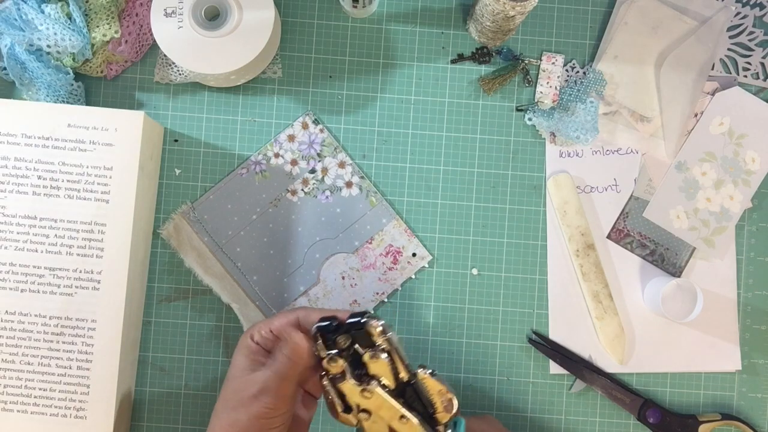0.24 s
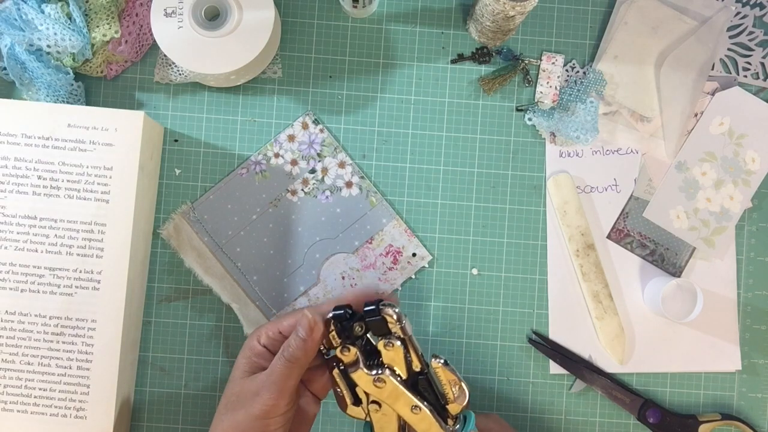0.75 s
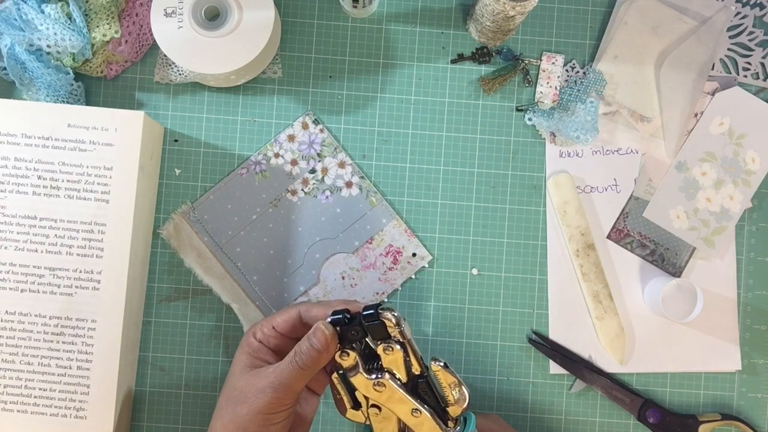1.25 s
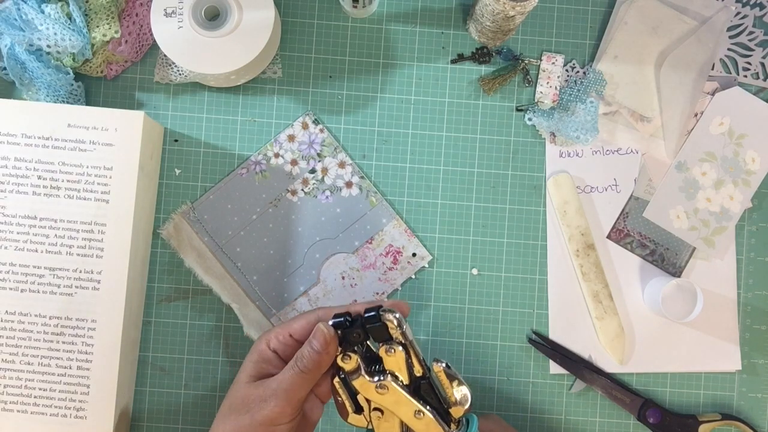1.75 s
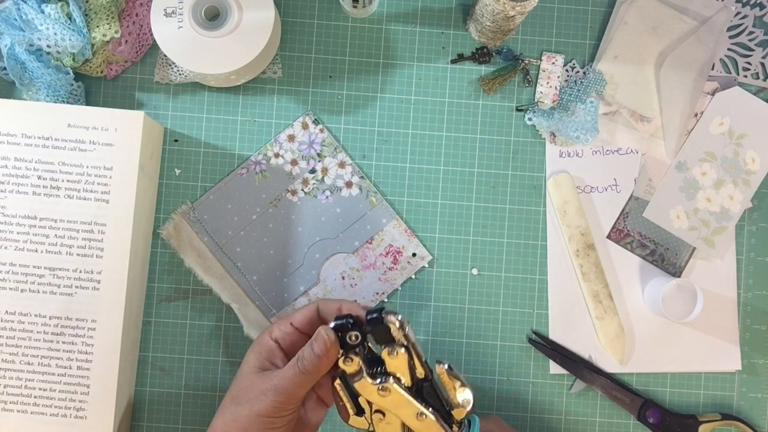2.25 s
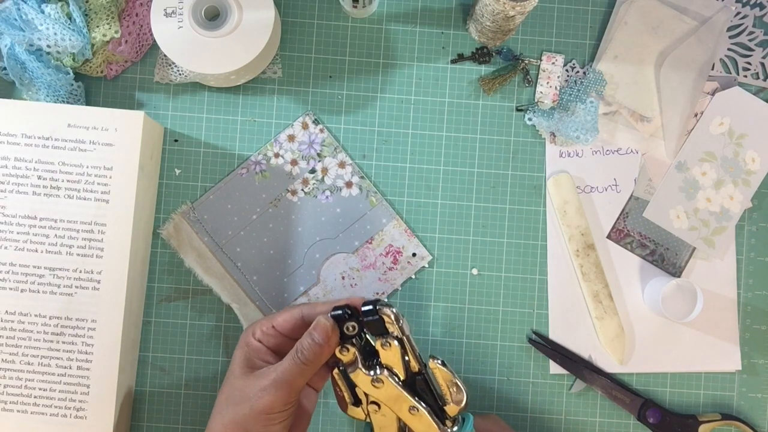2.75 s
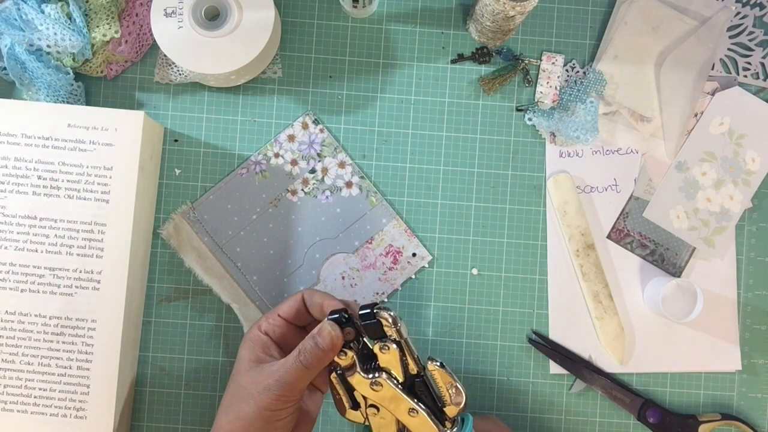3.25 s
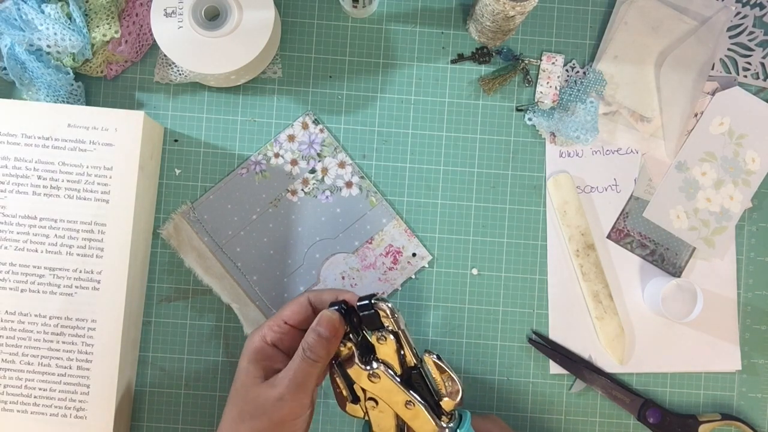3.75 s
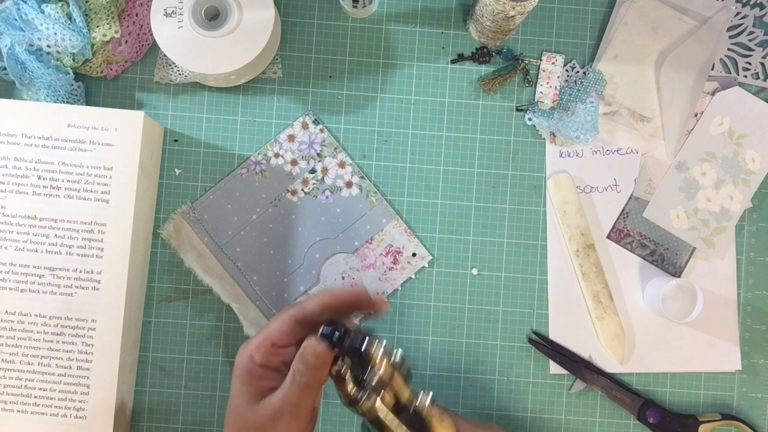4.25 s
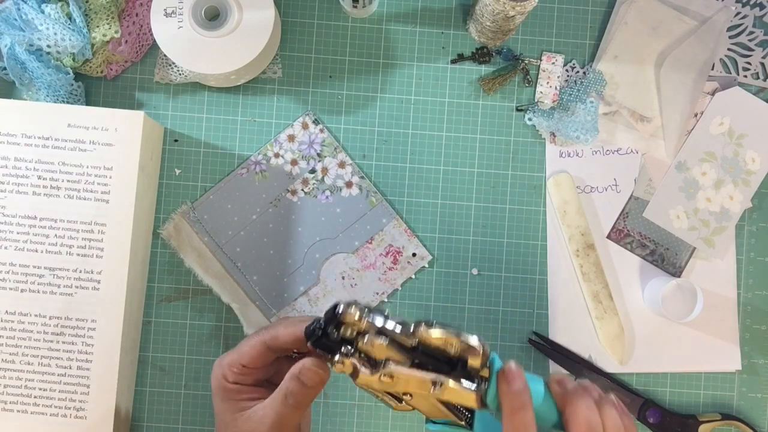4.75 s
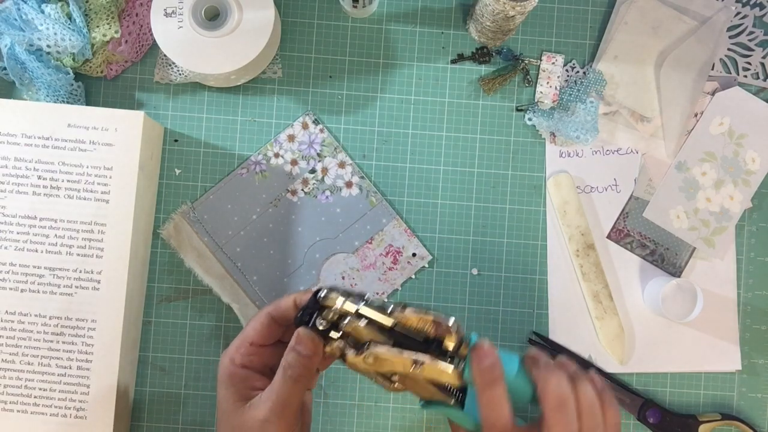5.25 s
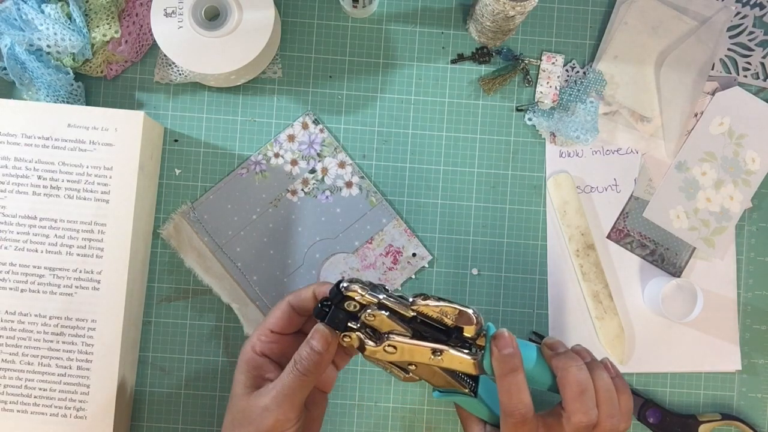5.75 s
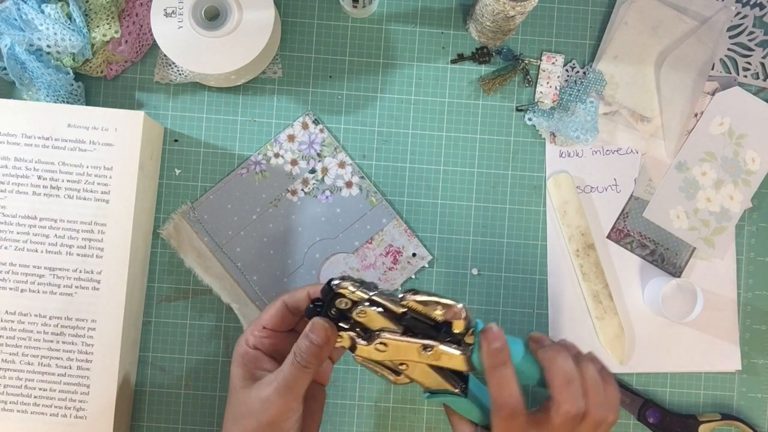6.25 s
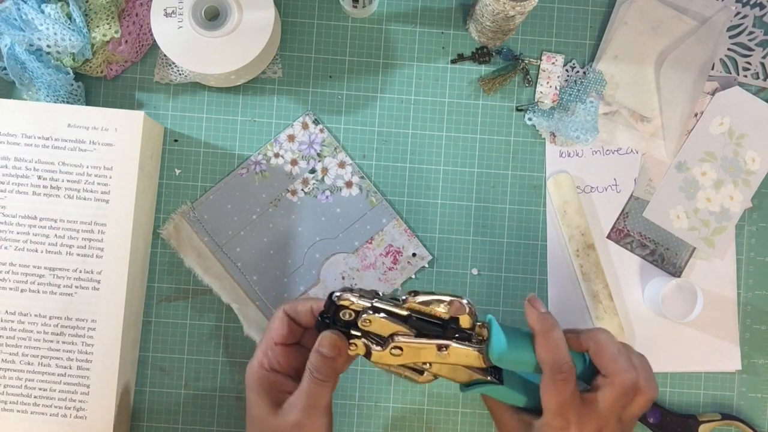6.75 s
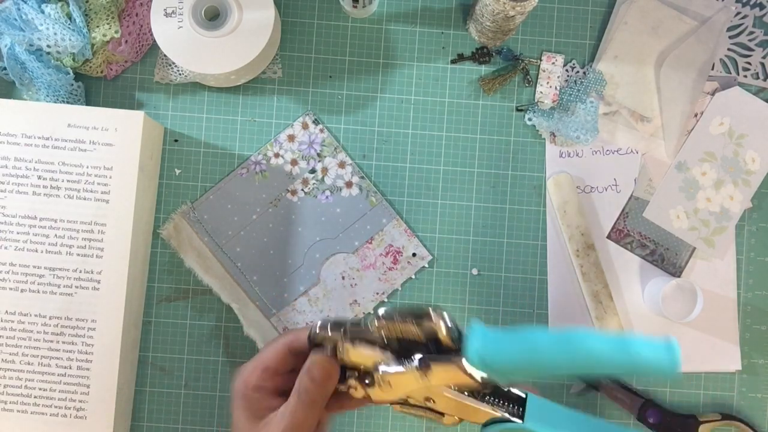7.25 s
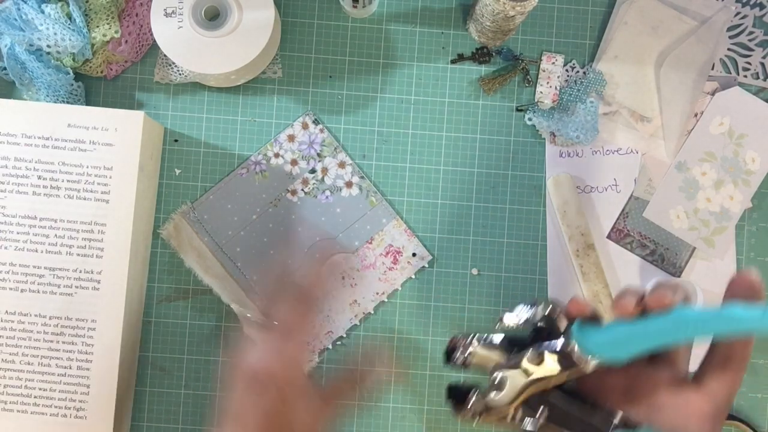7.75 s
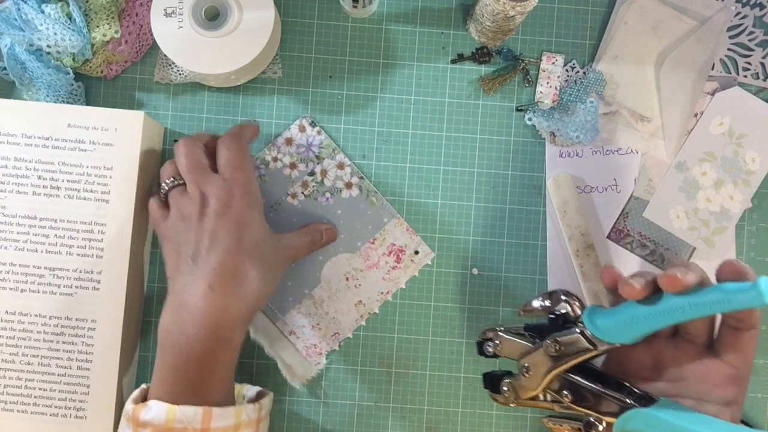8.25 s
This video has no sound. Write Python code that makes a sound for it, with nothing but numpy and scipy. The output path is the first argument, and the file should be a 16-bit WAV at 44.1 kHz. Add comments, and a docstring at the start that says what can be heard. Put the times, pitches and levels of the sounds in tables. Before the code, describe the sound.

Close-miked craft desk in a quiet small room, with low hum, deep slow sway and a barely audible high whine throughout. At 0.1 s a steel hand punch gives a crisp, bright double clack. Faint ticks and a soft desk rub follow near 1.5-2 s, a small click at 2.5 and a sharp one at 2.8, then tiny fumbling clicks. At 3.9 s comes the loudest event, a hard cracking snap with a faint metallic ring. Light handling clicks lead to a strong burst of clacks at 5.1-5.2 s with a low thump. A dry tick falls at 5.9, a double clack at 6.1 and a ringing clank at 6.7. The hinge squeaks briefly around 7.0 and 7.3, with duller handle knocks at 7.5. From 7.6 s hands swish and brush over paper and desk, peaking near 8.05, with faint last clicks at 8.3.

```python
"""Sharp metal clacks come first: a hand eyelet punch is handled over a craft desk, its dies clicking round.
Each blow is a burst of contacts ringing decaying sine tones; filtered random slips make the hinge creak.
Loose parts sing as single tones, ticks are tiny pulses, and sparse taps make the echoes.
Hands and paper rustle as coloured snaps. Behind them, shaped noise makes soft thumps, a low hum and
a slow sway, and one steady sine tone makes a thin whine."""
import sys
import numpy as np
from scipy import signal
from scipy.fft import rfft, irfft, next_fast_len
from scipy.io import wavfile
from scipy.ndimage import uniform_filter1d

SR = 44100
rng = np.random.default_rng(int(sys.argv[2]) if len(sys.argv) > 2 else 0)


def voltage_ratio(level):
    """Linear amplitude factor for a level in decibels (scalar or array-like)."""
    return 10 ** (np.asarray(level, float) / 20)


def waveform_to_disk(signal):
    """Save audio, clipped to [-1, 1], as 16-bit WAV at the path in sys.argv[1]."""
    frames = np.transpose(np.atleast_2d(signal))
    scaled = np.clip(frames, -1, 1) * 32767
    samples = np.round(scaled).astype(np.int16)
    wavfile.write(sys.argv[1], SR, samples)


N = 375291  # length in samples, about 8.5 s


def evened(x):
    """Scales a signal to an average strength (rms) of 1."""
    return x / np.sqrt(np.mean(x ** 2) + 1e-20)


def read(points, hz):
    """Reads a table of values against pitch, on a log frequency axis."""
    f, value = np.transpose(points)
    return np.interp(np.log(hz + 1), np.log(f + 1), value)


def along(rows):
    """Draws each column of a table of times as a curve with a value at every sample."""
    s, *columns = np.transpose(rows)
    return [np.interp(np.arange(N) / SR, s, c) for c in columns]


def coloured(x, points):
    """Filters x by a spectrum table and brings the result to rms 1."""
    size = next_fast_len(len(x))
    gain = voltage_ratio(read(points, np.fft.rfftfreq(size, 1 / SR)))
    return evened(irfft(rfft(x, size) * gain, size)[:len(x)])


def resonate(x, hz, width):
    """One resonance of gain 1 at its centre; its pitch may stand still or move."""
    turn = np.exp(2j * np.pi * np.cumsum(hz * np.ones(len(x))) / SR)
    r = np.exp(-np.pi * width / SR)  # a wider resonance dies faster
    return 2 * (turn * signal.lfilter([1 - r], [1, -r], x / turn)).real


def grains(per_s, spread_db):
    """Sparse clicks of random sign, a few of them large."""
    size = voltage_ratio(spread_db * np.minimum(rng.exponential(1, N), 4))
    sign = rng.choice([-1., 1.], N)
    return size * sign * (rng.random(N) < per_s / SR)


def blows():
    """Each blow is a short rattle of contacts that cracks and rings the steel; where it lands sets the colour."""
    # the blows: start_s, peak_db (4.5-9 kHz), clank_db (2-4.5 kHz) and fizz_db (over 9 kHz), both relative
    # to the peak, ring_hz (modes near it ring most)
    blow_rows = [(0.05, -47, 12.5, -4, 3350), (0.056, -42, 4, 13.5, 2150), (0.0906, -14.5, -10, 7.5, 13400),
                 (0.1, -31.5, 3.5, 13.5, 4040), (0.739, -54, -5, -8, 6100), (1.709, -51, -9, -12, 6130),
                 (1.838, -54, -3, -4, 7500), (1.8579, -49, -11, -11, 8460), (1.87, -52, -5, -4, 6200),
                 (1.972, -37.5, -3.5, -26, 3100), (2.288, -56, -3, -1, 6100),
                 (2.47, -33.5, -4.5, -18, 6640), (2.7923, -15, -11.5, 1.5, 8800),
                 (2.8003, -38.5, 4, -1, 7060), (2.989, -53, -8, -7, 8510), (3.01, -51, -8, -2, 6500),
                 (3.1604, -54.5, -4, -1, 6200), (3.2847, -42, -1.5, -6, 2370), (3.309, -42, -14, -12, 7890),
                 (3.686, -45.5, -2.5, -8.5, 2740), (3.9266, 5.5, -20.5, -6.5, 6750),
                 (4.1947, -47, -9, 1.5, 10500), (4.206, -54, -8, 3, 10900), (4.2376, -44, -18, -8, 7800),
                 (4.3526, -43.5, -10, 3, 6140), (4.423, -48, -6, 4, 6000), (4.754, -50, -3, -8.5, 5260),
                 (4.7804, -28.5, -14.5, -14, 8730), (4.8736, -35.5, -14, -11.5, 8550),
                 (5.0868, -11, -14.5, 9.5, 10350), (5.0975, -15, -5, -5, 10700),
                 (5.0994, -3.5, -11, 14, 10960), (5.2146, -13.5, -18, -9, 8430),
                 (5.2181, -14.5, -9.5, -5, 5670), (5.3685, -38, 2, 2, 3160),
                 (5.6374, -45, -9.5, -5.5, 3170), (5.6632, -33.5, -1.5, -22.5, 5370),
                 (5.8505, -44.5, -1, -2.5, 2260), (6.071, -39, 3.5, -10, 6500),
                 (6.075, -15.5, -17.5, -2, 6600), (6.102, -12, -10.5, 3.5, 12400),
                 (6.2393, -54, -1, 2, 3740), (6.6945, -28, -13.5, -29.5, 7020), (6.702, -37.5, 0, -7, 3130),
                 (6.712, -12.5, -9.5, -7.5, 3230), (6.97, -51, 7, -2, 3050), (7.0036, -32, -5, -3, 3060),
                 (7.2298, -38, -12, 0, 7100), (7.344, -41.5, -11, 1, 6000), (7.3838, -38.5, 1, 4, 5160),
                 (7.501, -49, 5.5, -4, 2800), (7.505, -34, 8, -9, 1240), (7.508, -33, 6, -4.5, 1400),
                 (7.529, -45, 0, -7, 2800), (7.5736, -35.5, -1.5, -13, 2320), (7.707, -46.5, 2, -7.5, 2100),
                 (8.253, -46, 1, -8, 2280), (8.27, -48, -1.5, 0, 2400), (8.301, -42.5, -18, -2, 7000)]
    # what the steel rings with: pitch_hz, level_db (relative, before each band is scaled), t60_s (60 dB fall)
    steel_modes = [(500, -10, .01), (750, -10, .01), (1200, -8, .018), (1500, -8, .014), (1900, -7, .01),
                   (2300, -6, .008), (2750, -6, .008), (3150, -6, .01), (3650, -4, .007), (4300, -2, .006),
                   (5150, -2, .006), (5600, -3, .005), (6200, 0, .006), (7000, -1, .005), (7600, -2, .005),
                   (8400, -2, .005), (9000, -2, .004), (9500, -3, .004), (10100, -2, .004),
                   (10700, 0, .006), (11400, -2, .004), (12100, -2, .004), (12700, -3, .004),
                   (13400, -3, .004), (14200, -4, .004), (15200, -4, .004)]
    # limits of the knock, clank, main and fizz bands: edge_hz
    band_limits = [300, 2000, 4500, 9000, 16000]
    hard_rattle_s, soft_rattle_s = .0025, .006  # hard blows are short, faint fumbles drag on
    soft_db, soft_span_db = -44, 2.5  # peak level halfway between hard and soft, and how gradual the change is
    push_s = 0.00047

    t, out = np.arange(SR // 10) / SR, np.zeros(N + SR)
    hz, db, t60 = (c[:, None] for c in np.transpose(steel_modes))
    rings = voltage_ratio(db - 60 * t / t60) * np.sin(2 * np.pi * hz * t)
    band = np.searchsorted(band_limits, hz[:, 0]) - 1
    sieves = [signal.butter(2, band_limits[k:k + 2], "band", fs=SR, output="sos") for k in range(4)]

    for s, peak_db, clank_db, fizz_db, ring_hz in blow_rows:
        at = round(s * SR)
        handle = ring_hz < band_limits[1]  # a struck handle knocks low
        knock_db = clank_db - 12.5 + 20 * handle
        soft = 1 / (1 + np.exp((peak_db - soft_db) / soft_span_db))
        length = hard_rattle_s + (soft_rattle_s - hard_rattle_s) * soft

        # separate contacts over a scrape
        chance = rng.standard_normal((3, 512))
        fade = 1 / (1 + (t[:512] / length) ** 3)
        contacts = (np.sign(chance[0]) + .4 * chance[0]) * (chance[1] > 1.35)
        contacts[0] = 2.0  # the first contact
        rattle = (contacts + 0.15 * chance[0]) * fade

        # modes near the point of contact ring most, and their levels vary slightly at random from blow to blow
        distance = np.log(hz[:, 0] / ring_hz) / 0.29
        near_db = (20.0 + 19.0 * handle) * np.exp(-distance ** 2)
        reach = voltage_ratio(near_db + 0.58 * chance[2, :len(hz)])

        # the whole tool jumps: a short dull push that grows twice as fast in dB as the peak
        push = (1 - t / push_s) * np.exp(-t / push_s)
        out[at:at + len(t)] += voltage_ratio(2 * peak_db - 32.5) * push

        for k, level_db in enumerate([knock_db, clank_db, 0, fizz_db]):
            body = (reach * (band == k)) @ rings
            body[0] += 4.0  # the crack of the contact itself
            sound = signal.sosfilt(sieves[k], signal.fftconvolve(body, rattle)[:len(t)])
            sign = (-1) ** k  # alternate signs let neighbouring bands join without a gap
            out[at:at + len(t)] += sign * voltage_ratio(peak_db + level_db) * sound / abs(sound).max()
    return out[:N]


def creak():
    """Uneven slips of the hinge ring the handles; the upper ring moves with the grip."""
    # hinge squeaks: peak_s, level_db, rise_s, low_ring_db (relative to level_db), upper_ring_hz
    squeaks = [(6.918, -59.5, .1, -5, 3080), (7.007, -32, 0.0093, -28.5, 3150), (7.15, -62, 0.28, -1, 2980),
               (7.24, -56, 0.11, -3, 2790), (7.281, -36, 0.077, -11.5, 2940),
               (7.324, -46.5, 0.035, -15, 2880)]
    t = np.arange(N) / SR
    s, level_db, rise, low_db, hz = np.transpose(squeaks)[:, :, None]
    away = np.maximum((s - t) / rise, (t - s) / (0.87 * rise))  # falls a little faster than it rises
    swell = voltage_ratio(level_db - 29.5 * away)  # climbs 29.5 dB over the rise
    slips = evened(grains(1000, 2.1))
    moving_hz = np.interp(t, s[:, 0], hz[:, 0])
    upper = evened(resonate(resonate(slips, moving_hz, 230), moving_hz, 580))
    lower = evened(resonate(resonate(slips, 1240, 100), 1280, 231))
    return swell.sum(0) * upper + (voltage_ratio(low_db) * swell).sum(0) * lower


def pings():
    """Loose springs and levers sing on as single tones that build up briefly and die."""
    # singing parts: start_s, pitch_hz, level_db (before build-up and wavering), t60_s (60 dB fall)
    tones = [(.091, 7160, -50, 0.16), (1.62, 1970, -66, 0.59), (3.928, 2810, -58, 1),
             (3.93, 3050, -51, 0.4), (3.96, 7040, -64, 0.6), (5.1, 1420, -45.5, 0.2),
             (5.098, 3240, -53.5, 0.35), (5.22, 2820, -47.5, 0.12), (6.102, 3350, -58, 0.31),
             (6.711, 3120, -53.5, 0.33), (6.712, 3320, -24, 0.028), (7.187, 3870, -43.5, 0.027),
             (7.229, 3820, -46, 0.027), (7.571, 1236, -40, 0.1)]
    t, out = np.arange(SR // 2) / SR, np.zeros(N + SR)
    for s, hz, db, t60 in tones:
        at = round(s * SR)
        build_up = 1 - np.exp(-t / (0.033 * t60))
        out[at:at + len(t)] += voltage_ratio(db - 60 * t / t60) * build_up * np.sin(2 * np.pi * hz * t)
    wavering = evened(uniform_filter1d(rng.standard_normal(N), size=500))  # slow and random, roughens the tones
    return out[:N] * voltage_ratio(4.6 * wavering)


def ticks():
    """Dry ticks with no ring or echo: smooth pulses about a tenth of a millisecond long."""
    # ticks: centre_s, level_db, sign (push or pull)
    tick_rows = [(5.8993, -17, -1), (1.9478, -33, 1), (4.5976, -31, 1)]
    out, pulse = np.zeros(N), np.hanning(6)
    for s, db, sign in tick_rows:
        out[round(s * SR) - 2:][:6] += sign * voltage_ratio(db) * pulse
    return out


def echoes(x):
    """Desk and walls: sparse taps, each band dying at its own speed; three tails take turns."""
    # how fast the near echo dies: pitch_hz, t60_s (60 dB fall)
    decay = [(300, .05), (2000, .07), (5000, 0.074), (10000, 0.078), (16000, 0.023)]
    out, turn = np.zeros(N), np.arange(N) / SR * 1.6
    for k in range(3):
        taps = np.zeros(SR // 2)
        at = np.arange(120, len(taps) - 20, 12)
        taps[at + rng.integers(0, 12, len(at))] = rng.choice([-1., 1.], len(at))
        hz, t, z = signal.stft(taps, SR, nperseg=128)
        fall_db = -60 * t / read(decay, hz)[:, None]
        dying = voltage_ratio(fall_db) + voltage_ratio(0.46 * fall_db - 15.0)  # the near desk dies fast, the far walls slower
        tail = signal.istft(z * dying, SR, nperseg=128)[1]
        share = np.sqrt(2 / 3) * np.cos(np.pi * (turn + k / 3))
        out += signal.fftconvolve(x * share, tail / np.linalg.norm(tail))[:N]
    return out


def rustle():
    """Dense tiny snaps in clumps, each layer with its own: dull under the hands, brighter from paper and skin."""
    # how busy the hands are: time_s, level_db (of the dull layer)
    busy = [(0, -65.5), (.15, -63.5), (.35, -70), (1.4, -71), (1.7, -68.5), (2.1, -69.5), (2.9, -68.5),
            (3.6, -69), (3.9, -62), (4.1, -64.5), (4.55, -61), (4.7, -66), (5.1, -64), (5.9, -70),
            (6.45, -65), (6.85, -64.5), (7.1, -61), (7.5, -60), (7.65, -54.5), (7.95, -55), (8.15, -59),
            (8.27, -61), (8.51, -52)]
    # single strokes of a hand: peak_s, half_length_s, desk_db, paper_db, skin_db
    stroke_rows = [(1.545, .08, -61, -85, -87), (1.617, 0.064, -58, -68, -69), (1.848, .05, -74, -72, -68),
                   (3.002, 0.059, -71, -71, -65), (3.887, 0.028, -63, -58, -63.5),
                   (4.309, 0.078, -67.5, -59, -64), (6.686, .05, -65, -59, -62.5),
                   (7.047, .05, -54.5, -56.5, -54), (7.3, 0.3, -82.5, -62, -60),
                   (7.73, 0.054, -48, -55, -45.5), (7.862, 0.12, -54, -54.5, -66),
                   (8.053, 0.044, -54, -42, -65), (8.113, 0.018, -54, -51, -66.5)]
    # relative colours of hands on the desk, paper and skin: pitch_hz, level_db (per Hz)
    rub_colour = [(120, -41), (250, -0.5), (700, -8.5), (1500, -11), (3000, -23.5), (8000, -61.5)]
    brush_colour = [(500, -26.5), (1500, -9.5), (3000, -8.5), (5000, -13), (8000, -23.5), (16000, -54.5)]
    hiss_colour = [(2000, -35.5), (5000, -10), (7000, -7.5), (11000, -11), (15500, -18.5), (16000, -33)]
    meet_db = -51.5  # all layers meet at this level; paper and skin fade faster below it

    out, t = np.zeros(N), np.arange(N) / SR
    busy_db = along(busy)[0] - meet_db
    s, half, *stroke_db = np.transpose(stroke_rows)[:, :, None]
    strokes = np.exp(-2 * ((t - s) / half) ** 2)
    # each layer: gain on busy_db, clump_db, snaps per second, colour
    layers = [(1, 2.6, 2000, rub_colour), (1.3, 2.4, 4000, brush_colour), (1.2, 1.5, 9000, hiss_colour)]
    for (gain, clump_db, per_s, colour), db in zip(layers, stroke_db):
        level = np.hypot(voltage_ratio(meet_db + gain * busy_db), (voltage_ratio(db) * strokes).sum(0))
        clumps = voltage_ratio(clump_db * evened(uniform_filter1d(rng.standard_normal(N), size=700)))
        out += level * coloured(clumps * grains(per_s, 0.83), colour)
    return out


def thumps():
    """The desk shakes the stand: soft low swells of noise."""
    # swells: peak_s, half_length_s, level_db
    swells = [(1.487, 0.13, -47.5), (5.131, .08, -36), (5.882, 0.047, -35.5), (6.092, 0.054, -38),
              (6.743, 0.074, -43), (8.043, .1, -46)]
    # their relative colour: pitch_hz, level_db (per Hz)
    thump_colour = [(12, -20.5), (25, -2.5), (40, 6), (70, -2), (150, -12.5), (400, -51.5)]
    s, half, db = np.transpose(swells)[:, :, None]
    swell = voltage_ratio(db) * np.exp(-2 * ((np.arange(N) / SR - s) / half) ** 2)
    return swell.sum(0) * coloured(rng.standard_normal(N), thump_colour)


def room_tone():
    """Shaped noise makes the steady hum of the house and the slow sway of the stand; a sine makes the whine."""
    # relative colours of the hum and the sway: pitch_hz, level_db (per Hz)
    hum_colour = [(21, -35), (38, -26), (52, -11), (75, -1), (103, -9.5), (180, -16), (301, -31.5),
                  (443, -33.5), (840, -40.5), (2010, -49.5), (8010, -57.5), (15500, -64.5), (16000, -93.5)]
    sway_colour = [(1, -19.5), (3, 8), (12, 16.5), (22, 6.5), (32, -6), (45, -61)]
    # strength of the sway and the whine: time_s, level_db (rms)
    sway_level = [(0, -30.5), (.15, -34), (1.8, -33), (2.3, -33), (3.5, -35.5), (4.5, -32.5), (5.03, -40),
                  (5.14, -21), (5.6, -29), (5.95, -22), (6.4, -30.5), (6.75, -25.5), (7.0, -36),
                  (8.51, -33.5)]
    whine_level = [(0, -75), (3, -73), (6.5, -74), (7.2, -72), (8.51, -71.5)]
    hum_db, whine_hz = -45, 8500

    hum_noise, sway_noise = rng.standard_normal((2, N))
    hum = voltage_ratio(hum_db) * coloured(hum_noise, hum_colour)
    sway = voltage_ratio(along(sway_level)[0]) * coloured(sway_noise, sway_colour)
    tone = np.sqrt(2) * np.sin(2 * np.pi * whine_hz * np.arange(N) / SR)  # rms 1
    return hum + sway + voltage_ratio(along(whine_level)[0]) * tone


def scene():
    """The punch close by with its echoes, over rustle, thumps and room tone."""
    punch = blows() + creak()
    near = punch + voltage_ratio(-15) * echoes(punch) + pings() + ticks()
    background = rustle() + thumps() + room_tone()
    return (near + background)[None]


def roll_off(x):
    """The treble ends steeply here."""
    return signal.sosfilt(signal.butter(12, 16390, fs=SR, output="sos"), x)


def record(dry):
    """Peaks beyond full scale are clipped flat."""
    mix = np.clip(dry, -1, 1)
    return roll_off(mix)


dry = scene()
out = record(dry)
waveform_to_disk(out)
```